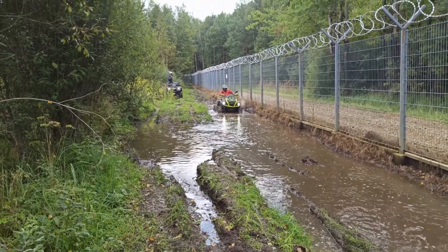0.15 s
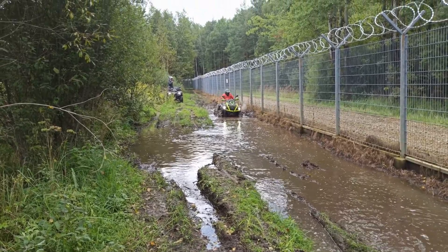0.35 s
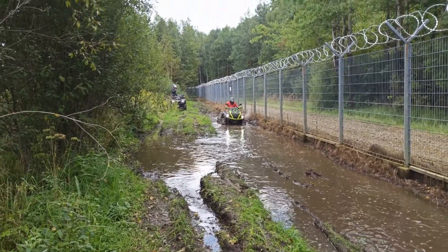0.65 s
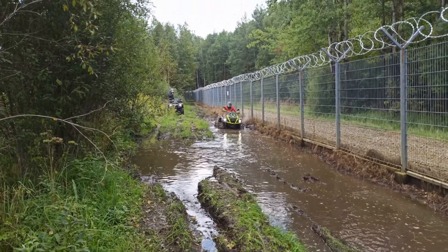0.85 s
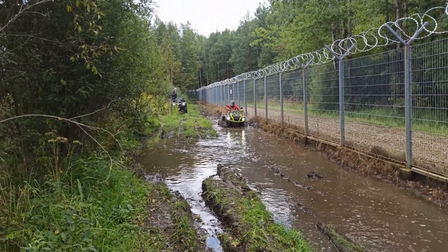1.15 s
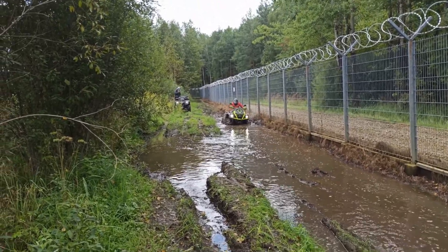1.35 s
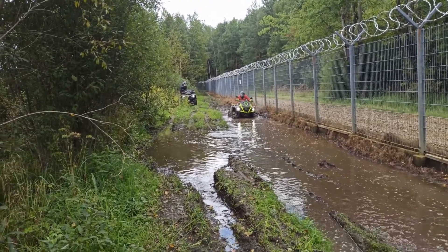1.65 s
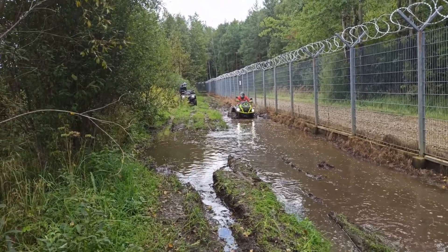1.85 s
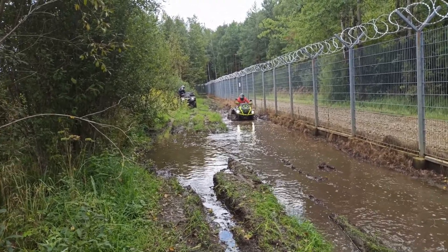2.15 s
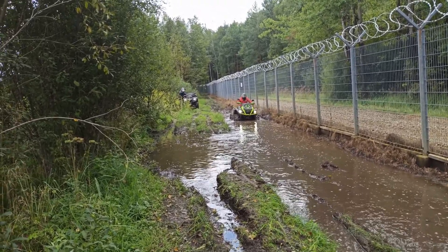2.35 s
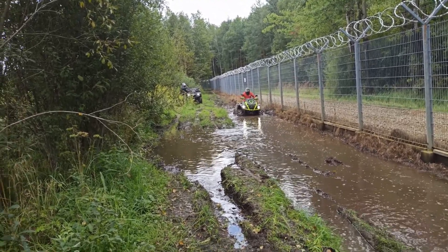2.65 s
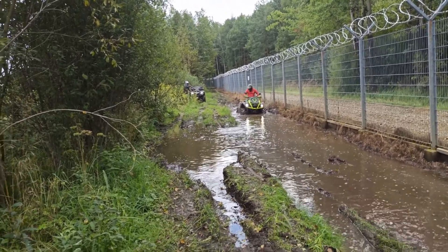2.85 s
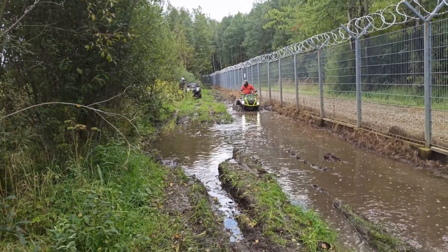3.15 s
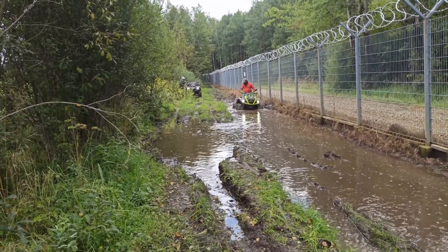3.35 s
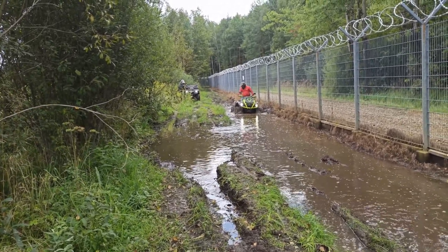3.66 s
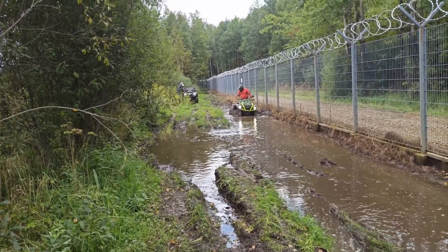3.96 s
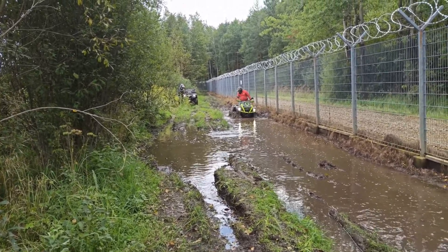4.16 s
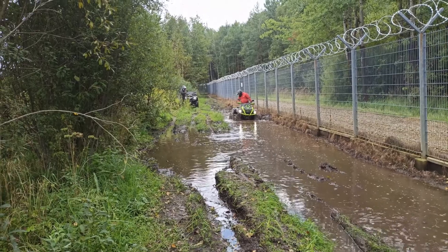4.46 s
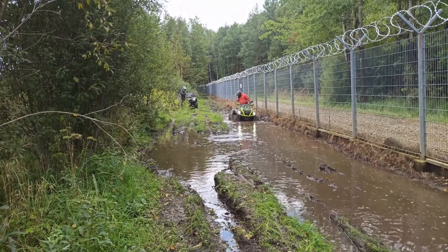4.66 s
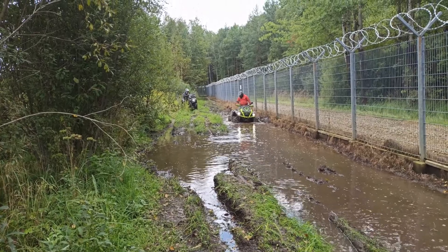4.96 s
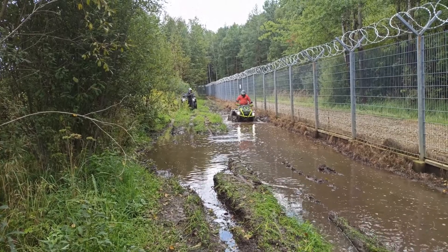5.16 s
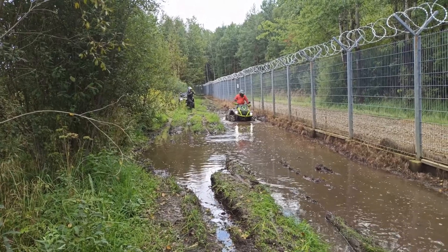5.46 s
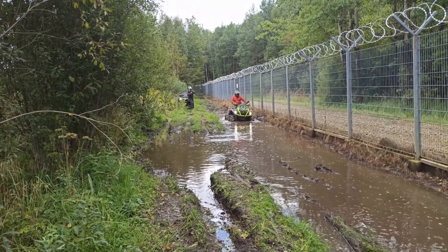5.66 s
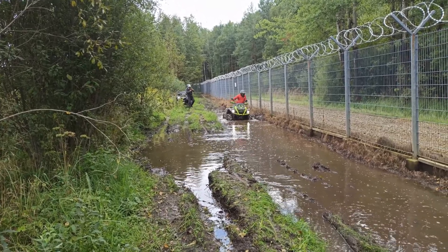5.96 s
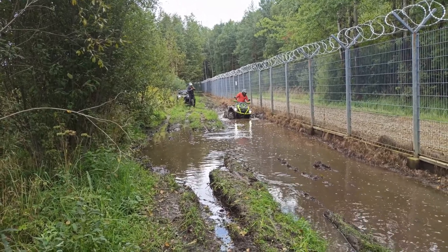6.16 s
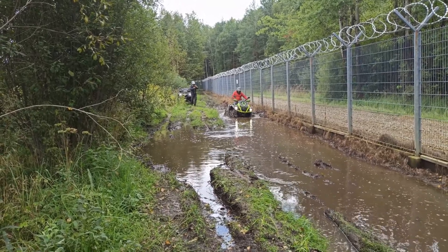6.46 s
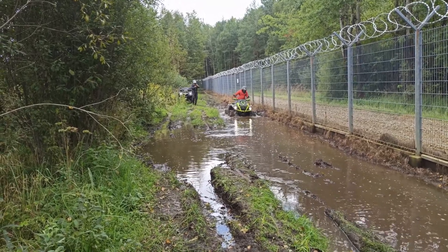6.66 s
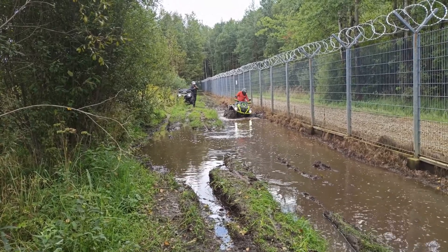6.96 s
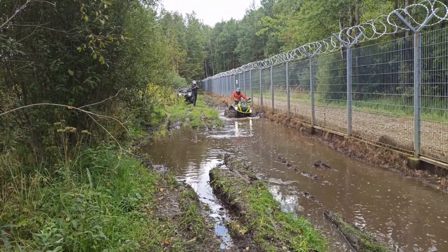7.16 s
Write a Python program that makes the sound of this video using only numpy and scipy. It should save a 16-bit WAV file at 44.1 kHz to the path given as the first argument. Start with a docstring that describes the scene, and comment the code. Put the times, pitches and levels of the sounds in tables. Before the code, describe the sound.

Lumpy quad engine idling at a distance outdoors, surging, sputtering back down and surging again over churned water, with bumps from a finger on one side.

```python
"""A muddy track: a two-cylinder quad bike idles and twice revs up, some way from a hand-held phone.
Uneven firings ring the silencer's modes; filtered noise makes the hiss of gas, valve gear and churned water.
Noise bursts tick in the treble, a thin tone squeaks once, and a low rumble lies underneath.
A finger covers the left microphone port: it hears a faint, dull share and the finger's own rubs and slips.
The right port stays open to the air."""
import sys
import numpy as np
from scipy import signal
from scipy.io import wavfile
from scipy.ndimage import uniform_filter1d

SR = 44100
rng = np.random.default_rng(int(sys.argv[2]) if len(sys.argv) > 2 else 0)


def dump_mix(stems):
    """Bounce the given channels to the path in sys.argv[1] as a 16-bit WAV at rate SR."""
    frames = np.atleast_2d(stems).T  # one column per channel
    limited = np.clip(frames, -1, 1)  # hard clip at full scale
    pcm = np.round(limited * 32767).astype(np.int16)
    wavfile.write(sys.argv[1], SR, pcm)


N = 322371
T = np.arange(N) / SR


def undb(db):
    """Decibels to gain."""
    return 10 ** (np.asarray(db) / 20)


def unit(x):
    """Scale to rms 1."""
    return x / np.sqrt(np.mean(x ** 2))


def curves(table):
    """Columns of a table joined by straight lines in time."""
    s, *columns = np.transpose(table)
    return [np.interp(T, s, c) for c in columns]


def band(x, lo_hz, hi_hz, order=2, kind="bandpass"):
    """Butterworth band filter."""
    return signal.sosfilt(signal.butter(order, [lo_hz, hi_hz], kind, fs=SR, output="sos"), x)


def noise():
    """White noise."""
    return rng.standard_normal(N)


def walk(rate_hz):
    """Slow random wander: levels drawn at this rate, then averaged twice to slew between them."""
    hold = int(SR / rate_hz)
    steps = np.repeat(rng.standard_normal(N // hold + 1), hold)
    return 1.3 * uniform_filter1d(uniform_filter1d(steps, hold), hold)[:N]


def clicks(times_s, sizes):
    """An impulse at each time."""
    at = (np.asarray(times_s) * SR).astype(int)
    keep = (at >= 0) & (at < N)
    return np.bincount(at[keep], np.asarray(sizes)[keep], N)


def decay(t, t60_s):
    """Exponential decay by 60 dB in t60_s."""
    return 1000 ** (-t / t60_s)


# Engine speed; each cylinder fires once a cycle: time_s, speed_cycles_per_s
ENGINE_SPEED = [(0, 11.48), (.59, 11.77), (1.39, 11.61), (1.78, 12.1), (2.6, 11.7), (2.66, 12.1),
                (2.88, 22.47), (3.07, 20.49), (3.18, 24.43), (3.74, 32.97), (3.9, 29.6), (4.0, 26.74),
                (4.2, 25.37), (4.46, 22.21), (4.6, 17.49), (4.97, 13.84), (5.28, 12.5), (5.82, 12.09),
                (6.0, 20.31), (6.35, 24.21), (6.5, 21.72), (6.72, 27.83), (7.07, 27.55), (7.31, 22.43)]
# Silencer modes: pitch_hz, t60_s, first_swing (-1 inward, 1 outward)
SILENCER_MODES = [(119, .042, -1), (190, .12, 1), (254, .018, 1)]
# How each cylinder rings those modes, one row a mode: level_db (at a blow of 0 dB), slope_db_per_db of blow
FIRST_DRIVE = [(-2.5, .35), (-7.5, .8), (1, 1.15)]
SECOND_DRIVE = [(-3.5, 1), (-13, 1), (-1.5, 1)]
START_CYCLE, SECOND_LAG = .4723, .37  # cycles
PIPE_DELAY_S = .0027


def engine():
    """Each firing rings the silencer's modes; returns the exhaust note and the gas puffs after firings."""
    cycle = START_CYCLE + np.cumsum(curves(ENGINE_SPEED)[0]) / SR
    count = np.arange(int(cycle[-1]) + 1)
    note, puffs, t = 0, 0, T[:SR // 4]
    cylinders = zip((0, SECOND_LAG), blows(), (FIRST_DRIVE, SECOND_DRIVE), (.6, 1.1))
    for lag, blow_db, drive, scatter_db in cylinders:
        times = np.interp(count + lag, cycle, T, left=-1, right=-1) + PIPE_DELAY_S
        scatter = rng.standard_normal(len(count))
        strength_db = np.interp(times, T, blow_db) + scatter_db * scatter
        for (hz, t60_s, swing), (db, slope) in zip(SILENCER_MODES, drive):
            ring = swing * np.sin(2 * np.pi * hz * t) * decay(t, t60_s)
            blow = clicks(times, undb(db + slope * strength_db))
            note = note + signal.fftconvolve(blow, ring)[:N]
        puff = clicks(times, undb(0.58 * strength_db + 1.7 * scatter))
        puffs = puffs + signal.lfilter([1], [1, -np.exp(-1 / (0.01 * SR))], puff)  # dies away over 10 ms
    return scattered(baffled(note)), puffs


# Throttle: time_s, opening (0 idle, 1 open)
THROTTLE_OPENING = [(0, 0.019), (2.6, 0.025), (2.78, 1), (3.78, 0.89), (3.8, 0), (4.08, 0.27), (4.15, 1),
                    (4.44, 0.26), (4.65, 0.38), (5.3, 0.074), (5.78, .1), (5.95, 0.98), (6.4, 0.93),
                    (6.5, 0.63), (6.55, 0.87), (7.31, 1)]
# Uneven running: start_s, end_s, first_cylinder_change_db, second_cylinder_change_db
UNEVEN_FIRING = [(2.94, 3.0, -1, -13.5), (3.695, 3.8, -16.5, 3.5), (3.8, 4.1, -0.5, -14.5),
                 (3.96, 3.99, 6.5, -9), (4.0, 4.06, -7, 2.5), (4.47, 4.63, -23.5, -2)]
IDLE_BLOW_DB, OPEN_BLOW_DB = (-9, -12), (0.5, -1)  # first and second cylinder


def blows():
    """Each cylinder's blow in dB: set by the throttle, shifted while it runs unevenly."""
    throttle = curves(THROTTLE_OPENING)[0]
    levels_db = []
    for k, (idle, full) in enumerate(zip(IDLE_BLOW_DB, OPEN_BLOW_DB)):
        change_db = sum(row[2 + k] * ((T > row[0]) & (T < row[1])) for row in UNEVEN_FIRING)
        levels_db.append(idle + (full - idle) * throttle + change_db)
    return levels_db


def baffled(note):
    """Baffles dull all above the modes; some of the sharp front passes, more on open throttle."""
    note = signal.sosfilt(signal.butter(4, 340, fs=SR, output="sos"), note)
    note = signal.sosfilt(signal.butter(2, 60, "high", fs=SR, output="sos"), note)
    crack = undb(-14 + 4.3 * curves(THROTTLE_OPENING)[0]) * band(note, 334, 1500, order=3)
    return band(band(note, 320, 420, order=1, kind="bandstop"), 54, 3000) + crack


def scattered(note):
    """Trees and wet ground scatter a blurred copy back, wavering with the air."""
    blur = band(noise()[:SR // 3], 80, 280) * decay(T[:SR // 3], .35)
    return note + undb(-49 + 2.5 * walk(25)) * signal.fftconvolve(note, blur)[:N]


# Levels at idle, before the gain that scene() gives hiss, ticks and squeak alike
CLATTER_IDLE_DB, CLATTER_DB_PER_OCTAVE, CLATTER_FADE_DB_PER_S = -57.5, 9, 4.5
GAS_IDLE_DB, GAS_DB_PER_OCTAVE, GAS_FADE_DB_PER_S = -52.5, 7, 25


def hiss(puffs):
    """Clatter and water droplets over noise, and the gas roar that follows each firing."""
    clatter_db = CLATTER_IDLE_DB + follow(CLATTER_DB_PER_OCTAVE, CLATTER_FADE_DB_PER_S)
    gas_db = GAS_IDLE_DB + follow(GAS_DB_PER_OCTAVE, GAS_FADE_DB_PER_S)
    drop_sizes = undb(3.0 * np.minimum(rng.exponential(size=N), 4)) * noise()
    drops = (rng.random(N) < 900 / SR) * drop_sizes  # about 900 a second
    splash = noise()[:300] * np.exp(-np.arange(300) / 90.0)
    drops = signal.fftconvolve(drops, splash)[:N]
    clatter = noise() * (1 + 0.5 * puffs) * undb(0.8 * walk(5.5)) + undb(-2.5) * unit(drops)
    gas = (band(noise(), 420, 620, order=3) + undb(-7) * band(noise(), 620, 900)) * (.45 + puffs)
    return undb(clatter_db) * unit(coloured(clatter, flicker_db=1.0)) + undb(gas_db) * unit(gas)


IDLE_CYCLES_PER_S = 11.7
START_DB = 3.5  # above idle, still fading from an earlier rev
NEARING_DB_PER_S = 0.3029  # the bike draws nearer
PULL_DB = 1  # added while the engine gains 50 cycles per s each second or more


def follow(db_per_octave, fade_db_per_s):
    """Level over idle: rises with speed, falls no faster than its fade, gains with pull and nearing."""
    speed = curves(ENGINE_SPEED)[0]
    db = db_per_octave * np.log2(speed / IDLE_CYCLES_PER_S)
    db[0] = START_DB
    held_db = np.maximum.accumulate(db + fade_db_per_s * T) - fade_db_per_s * T
    pull = uniform_filter1d(np.clip(np.gradient(speed) * SR / 50, 0, 1), size=3000)
    return held_db + NEARING_DB_PER_S * T + PULL_DB * pull


# Resonances of the open port and the path: pitch_hz, half_width_hz (roughly), level_db (before flicker)
PORT_COLOUR = [(1334, 210, 3), (2523, 160, 1), (3570, 270, -1), (4224, 188, -0.5), (6060, 350, -15),
               (6570, 176, 0), (7300, 127, 1), (7700, 75, -40)]


def coloured(x, flicker_db):
    """Resonances of the open port and the path, each flickering alone, plus steady broad bands."""
    peaks = sum(undb(db + flicker_db * walk(14)) * band(x, hz - 1.12 * w, hz + 1.01 * w, order=1)
                for hz, w, db in PORT_COLOUR)
    broad = undb(3.5) * band(x, 1147, 2310)
    broad += undb(-15.5) * band(x, 2550, 4780, order=3)
    broad += undb(-14.5) * band(x, 4930, 5750)
    top = undb(-28.5) * band(x, 8300, 19000, order=4)
    return peaks + broad + top


# Sharp ticks: start_s, level_db (of the burst before filters and later gains), centre_hz,
# bright_db (bright part over the centre band)
TREBLE_TICKS = [(0.9214, -36, 4270, -1.5), (1.044, -43, 4500, -15), (1.9925, -46, 4100, -15),
                (2.7513, -38, 1790, -10), (2.809, -34, 2000, -4), (2.9253, -32, 4440, -9),
                (2.941, -27, 4300, 4), (3.0936, -31.5, 4310, -6), (3.1805, -31.5, 4170, -7),
                (3.2148, -27.5, 4410, -22), (3.2965, -41, 7470, -11), (3.6524, -33, 4430, -9),
                (3.8245, -30.5, 4540, -14), (3.9444, -31, 4300, -8), (6.024, -35, 1590, -15),
                (6.244, -28.5, 3770, 0.5), (6.3222, -27.5, 4230, 1), (6.6717, -38, 4440, 4.5),
                (6.7543, -30, 4480, -2.5), (7.0938, -31, 4200, 5.5)]
TICK_T60_S = 0.052


def ticks():
    """Decaying noise bursts, each with a band of its own and a broad bright part."""
    out, t = np.zeros(N + SR // 5), T[:SR // 5]
    for s, db, hz, bright_db in TREBLE_TICKS:
        burst = rng.standard_normal(len(t)) * decay(t, TICK_T60_S)
        body = band(burst, .8 * hz, 1.25 * hz)
        bright = undb(bright_db) * band(burst, 5500, 16000, order=1)
        at = int(s * SR)
        out[at:at + len(t)] += undb(db) * (body + bright)
    return undb(3.5) * coloured(out[:N], flicker_db=-0.5)


SQUEAK_S, SQUEAK_LENGTH_S = .69, .12
SQUEAK_HZ, SQUEAK_DB = 1248, -48.5  # pitch before scoop and sag; level before the gain in scene()
SQUEAK_SCOOP_HZ, SQUEAK_SCOOP_S, SQUEAK_SAG_HZ_PER_S = 148, .012, 300


def squeak():
    """A thin tone with two overtones that scoops up to pitch and sags."""
    t = np.clip(T - SQUEAK_S, 0, SQUEAK_LENGTH_S)
    hz = SQUEAK_HZ - SQUEAK_SCOOP_HZ * np.exp(-t / SQUEAK_SCOOP_S) - SQUEAK_SAG_HZ_PER_S * t
    turn = 2 * np.pi * np.cumsum(hz) / SR
    envelope = np.abs(np.sin(np.pi * t / SQUEAK_LENGTH_S)) ** .5
    tone = np.sin(turn) + undb(-13) * np.sin(2 * turn) + undb(-17) * np.sin(3 * turn)
    return envelope * undb(SQUEAK_DB) * tone


# Finger slips on the left port: time_s, level_db (of the main push, before filters), spread_ms
FINGER_SLIPS = [(.77, -23, .4), (.9, -24, 0.63), (.925, -13.5, .26), (1.046, -20.5, 0.35),
                (1.087, -27, 0.4), (1.351, -27, .22), (1.435, -14, .3), (1.454, -18, 0.19),
                (1.463, -5.5, 0.24), (1.468, -5, 0.29), (1.4906, -3, 0.22), (1.5177, -3, 0.41),
                (1.526, -24, 0.17), (2.623, -19, .1), (2.639, -27, .41), (2.967, -24, .29),
                (3.823, -26, 0.37), (4.157, -28.5, .3), (4.757, -29, .2)]


def finger():
    """Skin pumps the air shut in the port: dense small slips, dull, and single large ones that rebound."""
    grain_sizes = undb(2.5 * rng.exponential(size=N)) * noise()
    grains = (rng.random(N) < 2500 / SR) * grain_sizes  # about 2500 a second
    rub = unit(band(grains, 46, 350))
    rub += undb(-12.5) * unit(band(grains, 350, 1400))
    rub += undb(-29) * unit(band(grains, 1400, 3800, order=3))
    slips = sum(signal.fftconvolve(clicks([s], [undb(db)]), push(ms) + 0.13 * push(.06), "same")
                for s, db, ms in FINGER_SLIPS)
    # the high-pass side of the band makes each push rebound
    return band(rubbing() * rub + band(slips, 70, 7000, order=1), 40, 7600, order=4)


def push(spread_ms):
    """A smooth bell-shaped push, peak 1."""
    return np.exp(-.5 * (np.arange(-200, 201) / (spread_ms * SR / 1000)) ** 2)


# Finger rubs: peak_s, level_db (at the peak), rise_s, fall_s (rise and fall each span 20 dB)
FINGER_RUBS = [(.62, -46, .06, 0.082), (.8, -46, .1, .3), (1.35, -33.5, .06, 0.081), (1.4, -36, 0.058, .1),
               (1.461, -19, 0.032, .03), (1.525, -39, .15, 0.013), (2.78, -40.5, 0.034, 0.075),
               (3.25, -38, 0.032, 0.046), (4.18, -52, 0.1, 0.17)]
RESTING_DB = -60


def rubbing():
    """Level of the rubbing: each rub rises and falls steadily in dB over the resting finger."""
    rubs = sum(undb(db - 20 * np.maximum((s - T) / rise, (T - s) / fall))
               for s, db, rise, fall in FINGER_RUBS)
    return undb(RESTING_DB) + rubs


# Soft swells of the top treble: peak_s, level_db, spread_s
TREBLE_SWELLS = [(.15, -60, 0.29), (2.12, -55, .05), (5.65, -65, 0.08)]


def swells():
    """Soft swells of noise above six kilohertz."""
    shape = sum(undb(db) * np.exp(-.5 * ((T - s) / spread) ** 2) for s, db, spread in TREBLE_SWELLS)
    return shape * unit(band(noise(), 6000, 17000))


def rumble():
    """A low rumble of filtered noise under the engine, wandering only slightly in level."""
    low = band(noise(), 90, 250, order=3) + undb(-26) * band(noise(), 18, 45)
    return undb(-29.5 + 0.55 * walk(4)) * unit(low)


def scene():
    """The right port hears the open air; the covered left one a faint, dull share, and the finger."""
    note, puffs = engine()
    treble = undb(6.5) * (hiss(puffs) + ticks() + squeak())
    right = note + rumble() + treble + swells()
    leak = undb(-32.0) * band(right, 150, 750, order=1)
    return np.array([leak + finger(), right])


def channel_hiss(gap_db, top_db):
    """One channel's own noise, summed from separate bands."""
    return (undb(-55.5) * band(noise(), 40, 500, order=1)
            + undb(-63.0) * band(noise(), 300, 3500, order=4)
            + undb(-73) * band(noise(), 3800, 9200, order=3)
            + undb(gap_db) * band(noise(), 7600, 11000, order=3)
            + undb(top_db) * band(noise(), 11900, 16000, order=8))


TOP_HZ = 15700


def record(dry):
    """The sound is nearly empty around ten kilohertz; each channel adds its hiss; the top is cut."""
    slope = signal.sosfilt(signal.ellip(2, .5, 16, [8500, 11600], "bandstop", fs=SR, output="sos"), dry)
    heard = signal.sosfilt(signal.ellip(5, .5, 40, [9500, 11600], "bandstop", fs=SR, output="sos"), slope)
    own = np.array([channel_hiss(-82.5, -68.5), channel_hiss(-99.5, -67.0)])  # left, right
    top_cut = signal.ellip(12, .2, 80, TOP_HZ, fs=SR, output="sos")
    return signal.sosfilt(top_cut, heard + own)


dry = scene()
out = record(dry)
dump_mix(out)
```